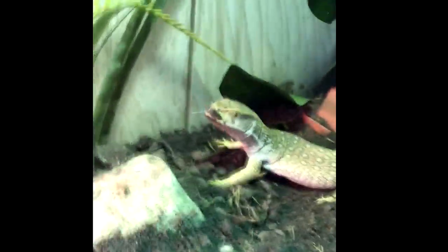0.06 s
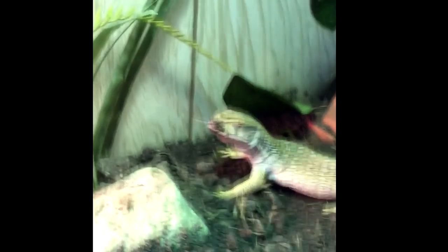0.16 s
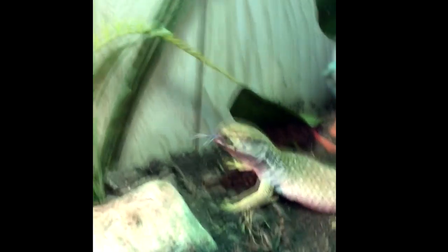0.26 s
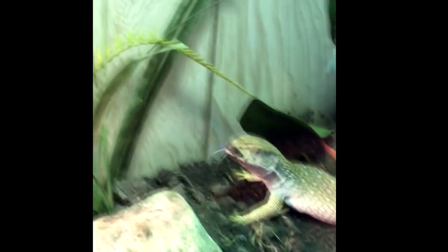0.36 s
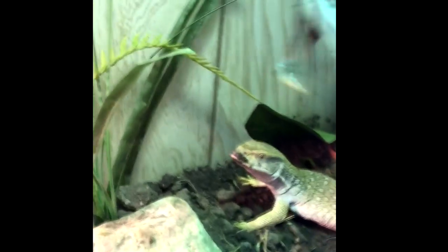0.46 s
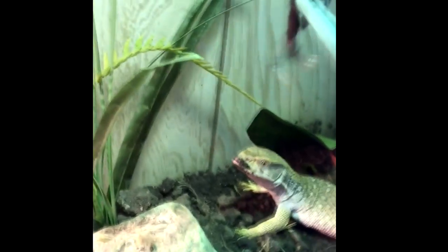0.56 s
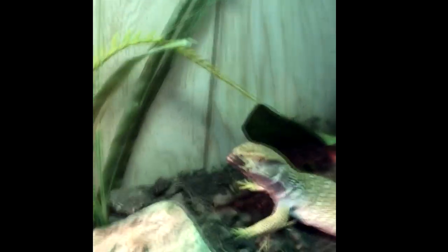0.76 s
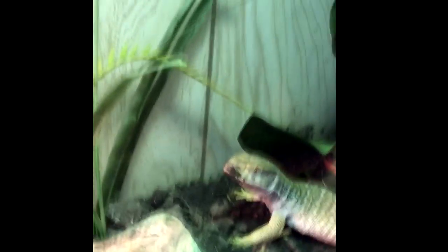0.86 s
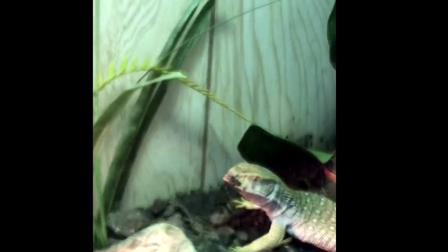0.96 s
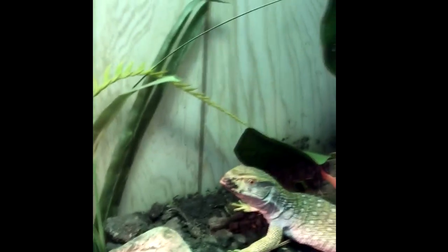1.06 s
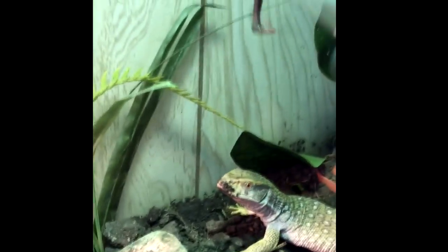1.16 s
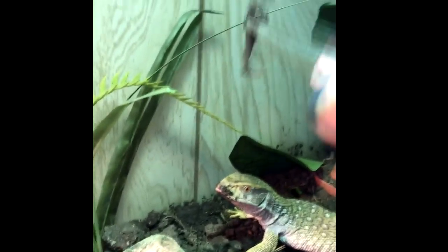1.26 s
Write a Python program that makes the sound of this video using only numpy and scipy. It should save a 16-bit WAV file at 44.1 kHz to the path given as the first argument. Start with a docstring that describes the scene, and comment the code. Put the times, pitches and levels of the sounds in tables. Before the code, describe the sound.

Something bumps an animal enclosure once, giving a close, hollow thud with a crunchy clack that dies quickly. Afterwards the quiet room holds only faint hiss and hum, low microphone handling and one light tap.

```python
"""Something bumps a reptile enclosure close to the microphone, in a quiet room with rumble and thin hum.
Faint scuffs come first. At 0.2 s it grazes, hits and rebounds: the pushes set the panels booming, the
frame clacks, the rough contact crunches and the room answers briefly. The rattling stops by 0.35 s.
Low handling rumble follows, then a soft tap at 0.8 s and two more faint scuffs."""
import sys
import numpy as np
from scipy import signal
from scipy.fft import rfft, irfft
from scipy.io import wavfile

SR = 44100
rng = np.random.default_rng(int(sys.argv[2]) if len(sys.argv) > 2 else 0)


def materialize(psi):
    """Save the field psi as 16-bit PCM at rate SR to the path in sys.argv[1].

    A 1-D psi becomes a single channel; in a 2-D psi each row is a channel.
    """
    bounded = np.clip(np.atleast_2d(psi).T, -1, 1)
    quanta = np.round(bounded * 32767).astype(np.int16)
    wavfile.write(sys.argv[1], SR, quanta)


N = 57330


def undb(db):
    """Decibels to gain."""
    return 10 ** (np.asarray(db) / 20)


def clock(start_s=0):
    """Seconds since the start, zero before it."""
    return np.maximum(np.arange(N) / SR - start_s, 0)


def fade(t, t60_s):
    """Exponential decay, 60 dB in t60_s."""
    return np.exp(-np.log(1000) * t / t60_s)


def swell(centre_s, length_s):
    """Gaussian rise and fall."""
    return np.exp(-2 * ((clock() - centre_s) / length_s) ** 2)


def through(x, response):
    """Convolution with an impulse response."""
    return signal.fftconvolve(x, response)[:N]


def butter(x, hz, kind="low", order=2):
    """Gentle filter, low-pass by default."""
    return signal.sosfilt(signal.butter(order, hz, kind, fs=SR, output="sos"), x)


def noise(gain):
    """Unit-rms noise shaped by gain(frequency)."""
    x = irfft(rfft(rng.standard_normal(N)) * gain(np.fft.rfftfreq(N, 1 / SR) + 1), N)
    return x / x.std()


def coloured(points):
    """Noise shaped by (Hz, dB) points, falling away below the first."""
    hz, db = np.array(points).T
    return noise(lambda f: undb(np.interp(np.log(f), np.log(hz), db)) * np.minimum(f / hz[0], 1) ** 2)


def band(hz, width_hz):
    """Noise in one steep resonance."""
    return noise(lambda f: 1 / (1 + ((f - hz * hz / f) / width_hz) ** 2))


def walk(rate_hz):
    """Slow random drift, spread 1."""
    return noise(lambda f: 1 / (1 + (f / rate_hz) ** 2) ** 2)


def tone(track_hz):
    """Unit-rms sine following a frequency track, random phase."""
    turns = rng.random() + np.cumsum(track_hz) / SR
    return np.sqrt(2) * np.sin(2 * np.pi * turns)


def ring(modes, t):
    """Decaying sines of a struck object."""
    return sum(undb(db) * np.sin(2 * np.pi * hz * t) * fade(t, t60_s) for hz, db, t60_s in modes)


def panel_boom():
    """Half-sine pushes set the panels swinging; the room holds the boom a moment."""
    # panel modes (frequency [Hz], level [dB], t60 [s])
    panel_modes = [(52.9, 2, 0.19), (79.8, -0.5, .16), (125.23, 8.5, 0.31), (158, -8, 0.14),
                   (172.3, 3, 0.27), (210, -14.5, 0.29), (242.3, -14.5, 0.17), (276, -26, 0.28),
                   (362.6, -18.5, 0.15)]
    # graze, hit and rebounds (time [s], level [dB])
    pushes = [(0.2022, -41.5), (0.2125, -31), (0.2322, -33), (0.2448, -38.5), (0.2582, -36.5),
              (0.3351, -52.5)]
    push_s, mic_low_hz, subsonic_hz = 0.0028, 39.3, 21.8
    reverb_db, reverb_rise_s = -44.5, 0.0066
    force = 0
    for start_s, db in pushes:
        pulse = np.sin(np.pi * np.minimum(clock(start_s) / push_s, 1))
        force = force - undb(db) * pulse / pulse.sum()
    direct = through(force, ring(panel_modes, clock()))
    direct = butter(direct, mic_low_hz, "high")  # the microphone loses the deepest bass
    direct = butter(direct, subsonic_hz, "high", order=1)
    t = clock(pushes[1][0])  # from the hardest push
    envelope = fade(t, t60_s=0.49) * (1 - np.exp(-t / reverb_rise_s))
    return direct + undb(reverb_db) * band(hz=154, width_hz=114) * envelope


def frame_clatter():
    """Each rattle rings the frame and crunches, with a duller after-ring; the softest are darker."""
    # frame modes (frequency [Hz], level [dB], t60 [s])
    frame_modes = [(653, -5, 0.069), (701.5, -5, 0.096), (767, -12, 0.099), (937.3, -10, 0.14),
                   (1104, -9.5, 0.086), (1328, -2, 0.052), (1640, -6.5, 0.065), (2200, 1.5, 0.048),
                   (2466, 1, 0.047), (2840, -2, 0.047), (3025, -0.5, 0.048), (3612, -5, 0.045),
                   (4020, 0, 0.027), (4460, -1.5, 0.027), (4890, -11, 0.078), (5170, -10.5, 0.1),
                   (8376, -14, .04)]
    # rough-contact spectrum (frequency [Hz], relative density [dB])
    crunch_spectrum = [(350, -6.5), (900, 5), (1500, -6), (1950, -1.5), (2400, -3.5), (3400, -4),
                       (4200, -6), (5200, -5.5), (5900, -10), (7000, -8), (7900, -13.5), (8500, -8),
                       (10000, -21), (11500, -15.5), (15500, -24)]
    # rattles (time [s], clack [dB], crunch [dB], rise [s], crunch cutoff [Hz], after-ring t60 [s])
    rattles = [(0.2042, -74, -40.5, 0.004, 5200, 0.056), (0.2109, -34.5, -37, 0.00034, 17000, 0.12),
               (0.2283, -54, -45.5, 0.0018, 17000, 0.1), (0.2502, -74, -48.5, 0.0015, 15500, 0.096),
               (0.2555, -62, -64, 0.00065, 1800, 0.17), (0.3360, -66.5, -58, 0.0032, 2000, 0.13)]
    clack_rise_s, after_db = 0.00051, -8.5
    out = 0
    for start_s, clack_db, crunch_db, rise_s, cutoff_hz, after_t60_s in rattles:
        t = clock(start_s)
        clack = ring(frame_modes, t) * (1 - np.exp(-t / clack_rise_s)) / 2
        after_ring = undb(after_db) * butter(coloured(crunch_spectrum), hz=12500) * fade(t, after_t60_s)
        burst = coloured(crunch_spectrum) * fade(t, t60_s=0.036)
        crunch = butter(burst + after_ring, cutoff_hz)
        out = out + (undb(clack_db) * clack + undb(crunch_db) * crunch) * (1 - np.exp(-t / rise_s))
    return out


def room_tail(x):
    """Short diffuse reverberation, decaying band by band."""
    # tail bands (centre and width [Hz], gain [dB], t60 [s])
    tail_bands = [(480, -19.5, 0.18), (944, -20.5, 0.3), (1830, -25.5, 0.15), (3750, -28.5, 0.24)]
    t, tail = clock(start_s=0.0072), 0
    for hz, db, t60_s in tail_bands:
        part = band(hz, hz) * fade(t, t60_s) * (t > 0)
        tail = tail + undb(db) * part / np.linalg.norm(part)
    return through(x, tail)


def soft_tap():
    """One light contact rings a few short modes."""
    # tap modes (frequency [Hz], relative level [dB], t60 [s])
    tap_modes = [(131, -1.5, 0.17), (220, 1, 0.026), (442, 6, 0.0059), (742, 5.5, 0.013),
                 (2270, 1.5, 0.0055)]
    return undb(-55) * ring(tap_modes, clock(start_s=0.7998))


def scuffs():
    """Faint rubs: brief swells of band noise."""
    # scuffs (peak time [s], length [s], centre [Hz], width [Hz], level [dB])
    rubs = [(0.008, 0.016, 3250, 350, -73), (0.051, .045, 3540, 304, -69),
            (0.073, 0.043, 2610, 2100, -72.5), (0.114, 0.075, 3570, 397, -79),
            (0.860, .012, 3360, 324, -73.5), (0.844, 0.13, 7970, 199, -86)]
    return sum(undb(db) * swell(peak_s, length_s) * band(hz, width_hz)
               for peak_s, length_s, hz, width_hz, db in rubs)


def handling_rumble():
    """Swells of low tones, each wandering in pitch."""
    # swells (peak time [s], length [s], frequency [Hz], level [dB])
    sways = [(0.408, 0.057, 115, -61.5), (0.414, 0.035, 55.24, -61.5), (0.48, 0.048, 47.2, -58.5),
             (0.495, 0.046, 140, -71), (0.567, 0.026, 134.4, -72), (0.57, 0.026, 45.3, -73),
             (0.692, 0.061, 47.9, -74), (0.851, 0.018, 51.9, -60), (0.865, 0.031, 140.8, -69.5),
             (0.934, 0.078, 49, -62.5), (1.11, .05, 52, -73.5), (1.125, 0.075, 140.2, -71.5)]
    wander = 0.039
    return sum(undb(db) * swell(peak_s, length_s) * tone(hz * (1 + wander * walk(rate_hz=16)))
               for peak_s, length_s, hz, db in sways)


def room_noise():
    """Steady air hiss and low rumble."""
    # air spectrum (frequency [Hz], relative density [dB])
    air = [(180, -38), (300, -4.5), (384, -3), (417, -2.5), (720, -5.5), (821, -3.5), (1110, -7.5),
           (1620, -6.5), (2170, -8), (2560, -8.5), (4960, -12), (7750, -14.5), (15500, -26)]
    # rumble spectrum (frequency [Hz], relative density [dB])
    rumble = [(25, -17), (50, -8), (90, -6.5), (145, -2.5), (220, -8.5), (330, -17), (500, -38)]
    return undb(-75) * coloured(air) + undb(-73) * coloured(rumble)


def electrical_hum():
    """Thin hum and whine, wavering in pitch and level."""
    # hum lines (frequency [Hz], rms level [dB])
    lines = [(145, -79.5), (1440, -87), (1560, -83.5), (1800, -87.5), (2520, -88), (2640, -92), (7558, -91),
             (8040, -94.5), (8522, -96)]
    waver_hz, waver_db = 1.0, 1.5
    out = 0
    for hz, db in lines:
        line = tone(hz + waver_hz * walk(rate_hz=12))
        out = out + undb(db + waver_db * walk(rate_hz=5.9)) * line
    return out


def scene():
    """Mono mix: the bump, small handling sounds, background."""
    clatter = frame_clatter()
    bump = panel_boom() + clatter + room_tail(clatter)
    handling = soft_tap() + scuffs() + handling_rumble()
    return (bump + handling + room_noise() + electrical_hum())[None]


def record(dry):
    """Steep low-pass on the top treble."""
    top_hz = 15730
    return signal.sosfilt(signal.ellip(12, .1, 70, top_hz, fs=SR, output="sos"), dry)


dry = scene()
out = record(dry)
materialize(out)
```